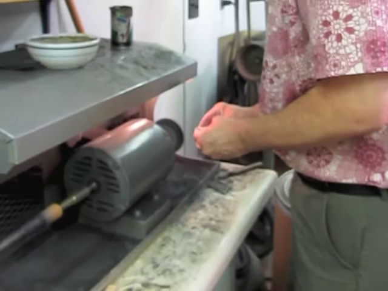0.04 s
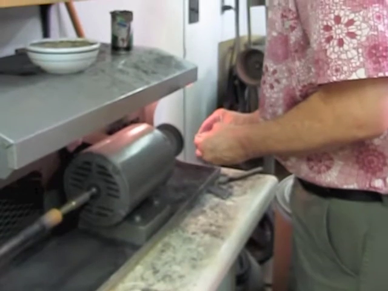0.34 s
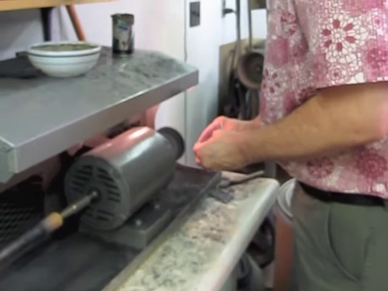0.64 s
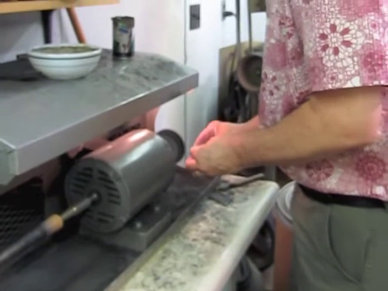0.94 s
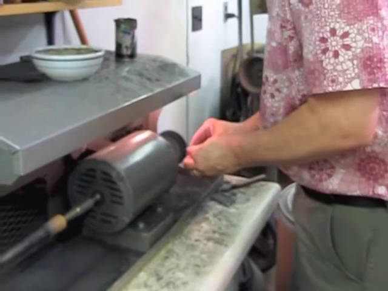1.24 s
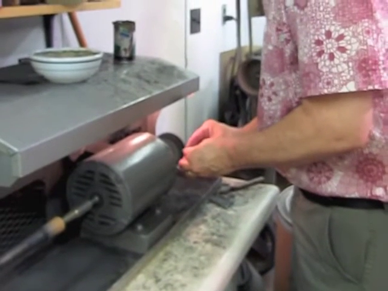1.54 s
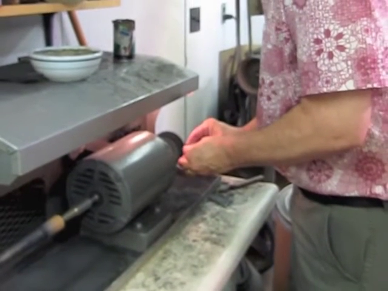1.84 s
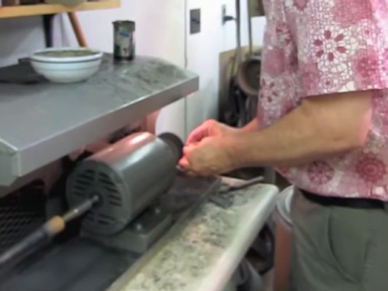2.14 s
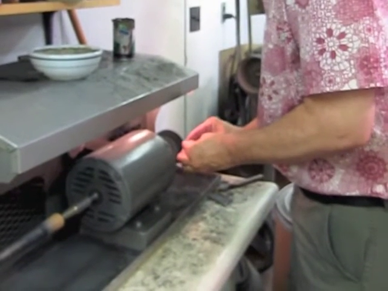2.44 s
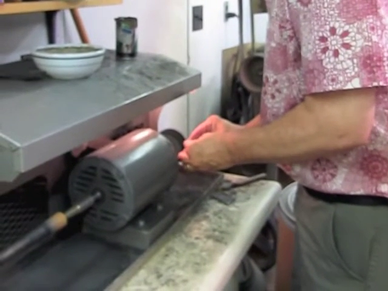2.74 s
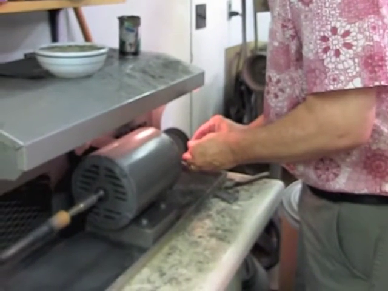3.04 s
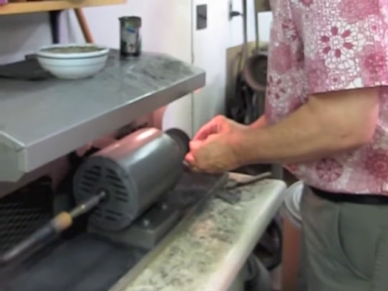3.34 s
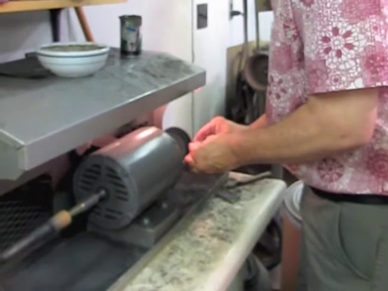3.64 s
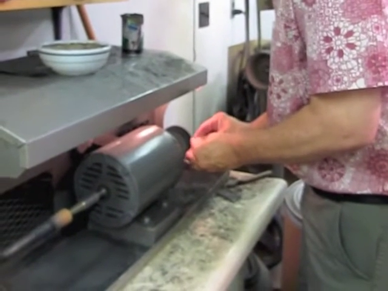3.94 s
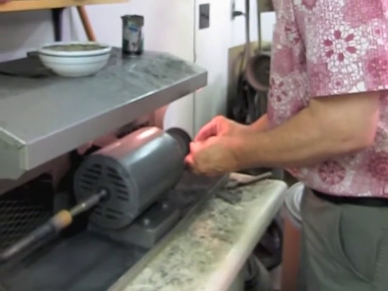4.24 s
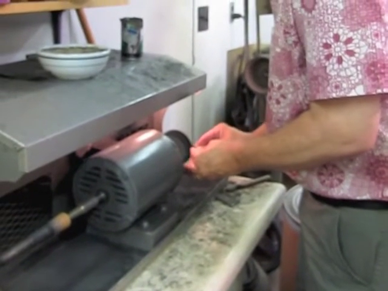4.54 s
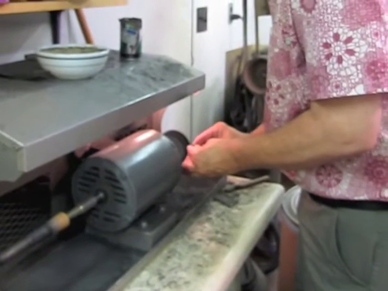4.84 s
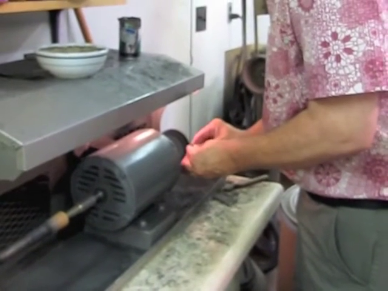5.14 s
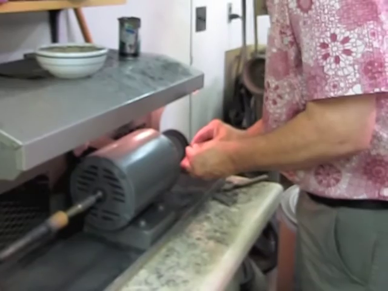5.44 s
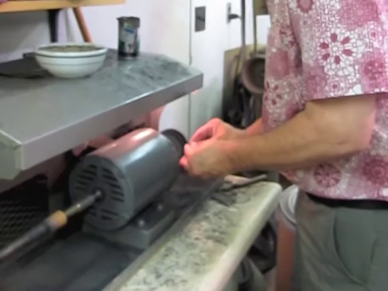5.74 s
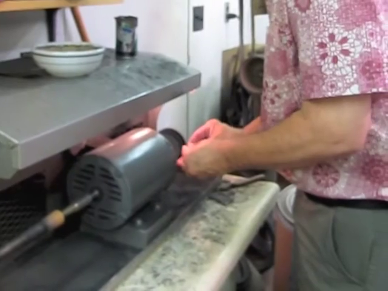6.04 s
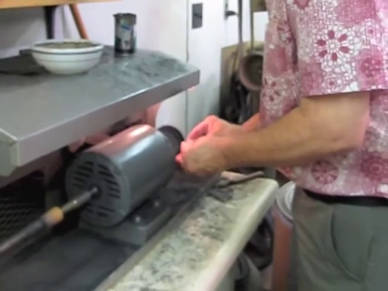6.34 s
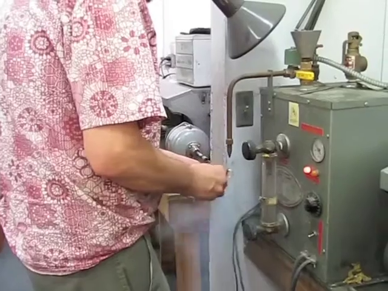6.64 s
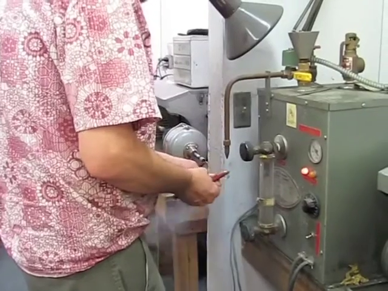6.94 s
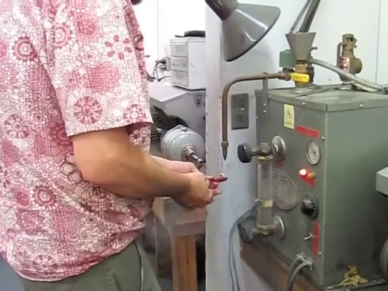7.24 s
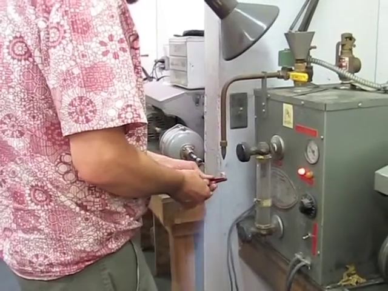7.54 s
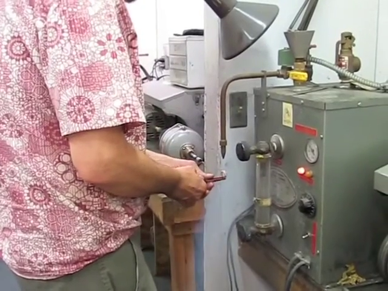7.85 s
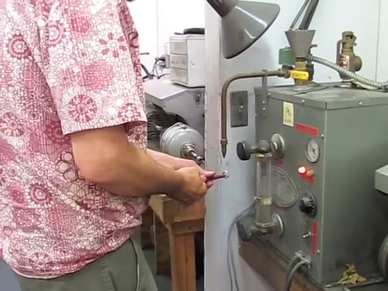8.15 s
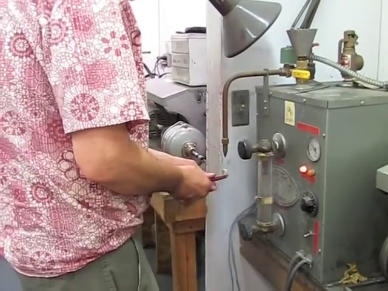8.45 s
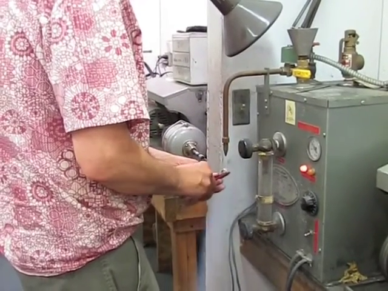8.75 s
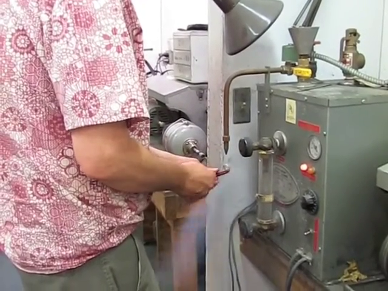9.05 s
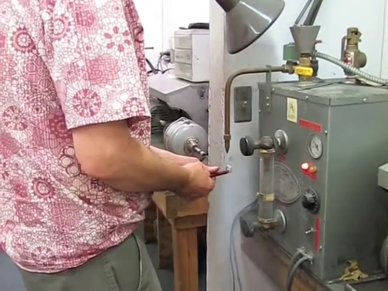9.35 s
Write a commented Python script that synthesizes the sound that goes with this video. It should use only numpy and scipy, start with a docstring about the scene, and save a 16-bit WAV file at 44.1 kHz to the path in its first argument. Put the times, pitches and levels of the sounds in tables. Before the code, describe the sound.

A workshop polishing wheel hums with a soft rubbing of cloth on metal, giving way to a loud hiss of steam.

```python
"""A polishing lathe in a jeweler's workshop, heard in stereo from the bench. It sings at ten times its
shaft rate over mains hum and a dust blower; a ring pressed on the buff slows the shaft a little and
makes the cloth hiss. At about 6.5 s the bench fades out and a steam cleaner fades in, loud at the
microphone: its jet hisses on the turning ring and phases with echoes off the moving hands."""
import sys
import numpy as np
from scipy import signal
from scipy.fft import rfft, irfft, next_fast_len
from scipy.io import wavfile
from scipy.ndimage import uniform_filter1d

SR = 44100
rng = np.random.default_rng(int(sys.argv[2]) if len(sys.argv) > 2 else 0)


def file_out(sig):
    """Save sig as 16-bit WAV at sys.argv[1]."""
    # one column per channel
    cols = np.atleast_2d(sig).T
    # limit, then scale
    lim = np.clip(cols, -1, 1)
    pcm = np.round(lim * 32767).astype(np.int16)
    wavfile.write(sys.argv[1], SR, pcm)


N = 419391

# Steady lines of mains and blower. Each row: pitch in Hz, level in dB, left minus right in dB.
HUM_LINES = [(25.8, -59, 9), (59.7, -42, 8), (119.6, -46.5, -4), (128.9, -37, 2.5), (179.6, -49.5, 0),
             (206.2, -43.5, 4)]
# Air from the blower and the idle wheel. Each row: frequency in Hz, relative density in dB.
AIR_COLOUR = [(15, -44), (35, -26), (80, -21), (125, -12), (170, -13), (230, -4.5), (300, -11), (400, -7),
              (480, -13), (750, -11.5), (1200, -19), (2500, -20), (3300, -28.5), (7000, -32.5),
              (11500, -39.5), (15000, -62)]
# Stereo width of the air and the cloth. Each row: frequency in Hz, side minus mid in dB.
BENCH_WIDTH = [(60, -2), (200, -14), (400, -10), (700, -6.5), (1300, -3.5), (4400, -5), (8000, -3.5),
               (14000, 6.5)]
# Where the air sits at the microphone. Each row: frequency in Hz, left minus right in dB.
AIR_BALANCE = [(60, 7), (300, 0.5), (1000, -2), (2400, -2.5), (5000, -1)]
# Resonances and notches of the dust hood. Each row: centre in Hz, width in Hz, gain in dB.
HOOD_MODES = [(206, 8.1, 7), (244, 16.7, 9.5), (279, 13, 9), (298, 13, -3), (325, 29, 7.5), (389, 22, 2.5),
              (409, 24, 6.5), (438, 12, 1.5), (712, 22, 0), (845, 43, 2), (1527, 98, 5), (5040, 300, 6),
              (7360, 400, 2.5)]

# The steam jet's hiss. Each row: frequency in Hz, relative density in dB.
STEAM_COLOUR = [(30, -27), (100, -19), (250, -15.5), (1100, -16), (2000, -13), (3000, -9.5), (4200, -6.5),
                (5800, -4), (7000, 1.5), (9000, -1), (10500, 0.5), (12800, -1), (14200, 1), (15700, -4)]
# Stereo width of the hiss; the overloaded microphone adds a low rush, opposite in left and right.
# Each row: frequency in Hz, side minus mid in dB.
HISS_WIDTH = [(60, 10), (300, 8.5), (700, 8), (1300, 2.5), (2400, -1), (3600, -3.5), (6500, -4), (9000, -1),
              (13000, 0), (15000, -12)]
# Resonances and notches of nozzle and ring. Each row: centre in Hz, width in Hz, gain in dB.
NOZZLE_MODES = [(2070, 220, 1.8), (4100, 260, 1.5), (5070, 200, 1.7), (6800, 240, 0.3), (7100, 160, -0.5),
                (8240, 250, 2.5), (9750, 180, -0.5), (10200, 270, 2.2), (12720, 350, -1)]
# The ring slips out of the jet's core. Each row: start and end in seconds, dip in dB shared out below.
RING_SLIPS = [(6.5, 6.66, 2), (6.76, 7.0, 2), (7.26, 7.38, 1.5), (7.49, 7.6, 1.5), (7.9, 8.08, 3.2),
              (8.49, 8.62, 2), (8.86, 9.06, 1), (9.39, 9.6, 1)]
# The ring sits squarely in the jet. Each row: start and end in seconds, rise in dB shared out below.
SPLASH_SURGES = [(7.66, 7.89, 1.9), (8.07, 8.44, 1.5), (9.18, 9.44, 1.6)]
# The ring's edge cuts into the jet and sharpens the hiss.
# Each row: middle and length in seconds, rise in dB shared out below, whistle pitch in Hz.
EDGE_CUTS = [(7.18, 0.21, 1.3, 7300), (7.41, .08, 1.5, 7200), (7.84, 0.1, 0.8, 7000),
             (8.91, 0.16, 2.5, 8200), (9.13, 0.18, 2, 7600)]
# The jet strikes more or less of the hands. Each row: start and end in seconds, low rush change in dB.
HAND_BUFFETS = [(6.5, 6.82, -1), (7.17, 7.27, 1.2), (7.6, 7.894, 1.1), (7.98, 8.08, -2), (8.56, 8.8, 0.5),
                (8.893, 9.18, 2.5), (9.36, 9.6, -2)]
# The steam's bands. Each gives: resting gain in dB, share of a slip, of a surge, of a cut.
RUSH, SPLASH = (-0.5, 0.33, 0.1, 0.1), (0.3, 0.62, 0.73, 0.089)
EDGE, FREE_JET = (-0.25, 0.32, 0.3, 0.69), (0, 0.03, 0.1, 0.25)

# Cloth on metal. Each row: frequency in Hz, relative density in dB.
CLOTH_COLOUR = [(300, -1.5), (900, -4), (1800, -1.5), (3500, -4.5), (6000, -5), (9000, -11.5),
                (12000, -18.5), (15500, -33)]
# The ring is pressed on the buff. Each row: start and end in seconds, force 0-1, attack in seconds.
RING_PRESSES = [(1.24, 2.62, 0.56, 0.46), (2.549, 3.6, .92, .12), (3.34, 4.66, 1, .4),
                (4.879, 5.998, .76, 0.402), (5.68, 6.8, 1, .36)]
# The ring catches and shakes the wheel. Each row: start and end in seconds, added shake in dB.
RING_CATCHES = [(1.42, 1.6, -4), (1.8, 2.24, 1), (2.15, 2.49, 3), (2.94, 3.49, -3.5), (3.72, 3.92, -5),
                (4.82, 4.99, -2), (5.78, 6.02, -2)]
# The ring grazes the wheel and the fifth overtone rings. Each row: start and end in seconds, level in dB.
RING_GRAZES = [(.9, 2.88, -54), (4.38, 5.4, -55)]
# Tones of the shaking wheel. Each row: multiple of the shaft rate, level in dB at a shake of 0 dB.
SHAFT_ORDERS = [(8, -49), (9, -40), (12, -54), (16, -57), (26, -53), (31, -58)]
# Bearing whine, beating against the overtones.
# Each row: multiple of the lathe's tone, level in dB running free, left minus right in dB.
BEARING_WHINE = [(4.0395, -46, -5), (7.77, -64, 0), (8.079, -57, 0), (8.415, -55, 0), (11.195, -63, 0),
                 (11.49, -65.5, 0), (12.118, -59, 0)]
# The lathe's overtones. Each row: multiple of the tone, relative level in dB, left minus right in dB.
LATHE_OVERTONES = [(2, -28, -12), (3, -30.5, 2), (4, -19.5, -17.5), (8, -28, -4), (9, -30.5, -4),
                   (10, -38, -5), (11, -32.5, -6), (12, -30, -7), (14, -34, 16), (15, -38, 4), (16, -40, 7)]

IDLE_HZ, SAG_HZ = 597.5, 2.05  # the lathe's tone running free, and its drop under full force
FADE_OUT_S, CHANGE_S, FADE_IN_S = 6.445, 6.54, 6.645


def undb(db):
    """Decibels to gain."""
    return 10 ** (np.asarray(db) / 20)


def along(points, hz):
    """Read (Hz, value) points on a log-frequency axis."""
    f, value = np.transpose(points)
    return np.interp(np.log(hz + 1), np.log(f), value)


def walk(rate):
    """Smooth chance with a spread near 1, changing about rate times a second."""
    k = max(int(SR / rate), 1)
    steps = np.repeat(rng.standard_normal(N // k + 1), k)
    return 1.3 * uniform_filter1d(uniform_filter1d(steps, k), k)[:N]


def hold(start, end, attack_s, release_s):
    """An envelope that rises from start, holds at 1 and has fallen by end."""
    t = np.arange(N) / SR
    return np.clip(np.minimum((t - start) / attack_s, (end - t) / release_s), 0, 1)


def swell(middle, length):
    """A bell-shaped swell of height 1, with its length taken at half height."""
    t = np.arange(N) / SR
    return 0.5 ** ((2 * (t - middle) / length) ** 2)


def pan(db):
    """Left and right gains for a level difference."""
    return undb(np.array([[1], [-1]]) * db / 2)


def turbulence(colour, width, db, modes=(), balance=((100, 0), (1000, 0))):
    """Stereo flow noise with a colour and resonances; db is its mid level before the balance."""
    size = next_fast_len(N, real=True)
    hz = np.fft.rfftfreq(size, 1 / SR)
    modes_db = sum(lift / (1 + (2 * (hz - f) / width_hz) ** 2) for f, width_hz, lift in modes)
    gain = undb(along(colour, hz) + modes_db)
    mid, side = rfft(rng.standard_normal((2, size))) * gain / np.sqrt(np.mean(gain ** 2))
    channels = mid + np.array([[1], [-1]]) * side * undb(along(width, hz))
    return undb(db) * irfft(channels * pan(along(balance, hz)), size)[:, :N]


def partial(cycles, db, pan_db, flutter, skew_rad=0):
    """A stereo sine; moving air and changing reflections make it flutter at the microphone."""
    phase = 2 * np.pi * (cycles + rng.random())
    direct = np.array([np.sin(phase), np.sin(phase + skew_rad)])
    scattered = np.array([walk(9) * np.cos(phase), walk(9) * np.sin(phase)])
    return undb(db) * pan(pan_db) * (direct + flutter * scattered)


def resonance(x, hz, width_hz):
    """A band-pass with gain 1 at a centre that may move."""
    carrier = np.exp(2j * np.pi * np.cumsum(hz) / SR)
    pole = np.exp(-np.pi * width_hz / SR)
    return 2 * np.real(signal.lfilter([1 - pole], [1, -pole], x / carrier) * carrier)


def reflections(x, share, drift_ms, delays_ms=(1.5, 16), count=10):
    """Small surfaces close by comb the treble, differently left and right; echoes shift as things move."""
    n = np.arange(N)
    treble = signal.sosfilt(signal.butter(2, 800, "high", fs=SR, output="sos"), x)
    out = x.copy()
    for channel in range(2):
        for delay_ms in rng.uniform(*delays_ms, count):
            place = n - (delay_ms + drift_ms * walk(1.55)) * SR / 1000
            echo = np.interp(place, n, treble[channel])
            out[channel] += share / np.sqrt(count) * rng.choice([-1, 1]) * echo
    return out / np.sqrt(1 + share ** 2)


def blower():
    """The bed behind the bench: mains hum, the blower's blade tone, and air drawn through the dust hood."""
    t = np.arange(N) / SR
    hum = sum(partial(hz * t, db, pan_db, flutter=0.1, skew_rad=0.43) for hz, db, pan_db in HUM_LINES)
    air = turbulence(AIR_COLOUR, BENCH_WIDTH, -31.5, HOOD_MODES, AIR_BALANCE) * undb(0.27 * walk(12))
    return hum + reflections(air, share=0.31, drift_ms=0.0054)


def nozzle(hiss, cuts):
    """The nozzle's resonances slide together and waver as the ring turns; each cut adds an airy whistle."""
    tuning = 1 + 0.008 * walk(5)
    modes = sum((undb(db + 1.1 * walk(7)) - 1) * resonance(hiss, hz * tuning, width_hz)
                for hz, width_hz, db in NOZZLE_MODES)
    whistles = sum((undb(1.5 * db) - 1) * resonance(hiss, hz * tuning, width_hz=450) for db, hz in cuts)
    return hiss + modes + whistles


def steam():
    """The jet sputters; the turning ring shifts it between low rush, splash, edge hiss and free jet."""
    slip_db, surge_db, buffet_db = (sum(db * hold(start, end, 0.04, 0.04) for start, end, db in table)
                                    for table in (RING_SLIPS, SPLASH_SURGES, HAND_BUFFETS))
    cuts = [(db * swell(middle, length), hz) for middle, length, db, hz in EDGE_CUTS]
    cut_db = sum(db for db, hz in cuts)
    rush_db, splash_db, edge_db, jet_db = (db - slip * slip_db + surge * surge_db + cut * cut_db
                                           for db, slip, surge, cut in (RUSH, SPLASH, EDGE, FREE_JET))
    hiss = nozzle(turbulence(STEAM_COLOUR, HISS_WIDTH, -16), cuts)
    lowpasses = (signal.butter(4, hz, fs=SR, output="sos") for hz in (1800, 6400, 10500))
    low, below_edge, below_jet = (signal.sosfiltfilt(sos, hiss) for sos in lowpasses)
    rush = low * undb(rush_db + buffet_db + 0.31 * walk(12))
    splash = (below_edge - low) * undb(splash_db + 0.5 * walk(40))
    edge = (below_jet - below_edge) * undb(edge_db + 0.5 * walk(40))
    jet = (hiss - below_jet) * undb(jet_db + 0.4 * walk(25))
    sputter = undb(0.35 * walk(200))
    return (rush + splash + edge + jet) * sputter


def steam_cleaner():
    """The jet at the microphone: phased by the moving hands and body, then echoed from farther off."""
    phased = reflections(steam(), share=0.37, drift_ms=0.17, delays_ms=(1.1, 3.8), count=4)
    return reflections(phased, share=0.36, drift_ms=0.015, delays_ms=(5, 16), count=7)


def buff(cycles, force):
    """Cloth rubs the ring with a power that follows the force, pulsing with the shaft and the tone."""
    idle_db, pressed_db = -10, 1.66
    rub = np.sqrt(undb(idle_db) ** 2 + undb(pressed_db) ** 2 * force)
    pulsing = 1 + 0.054 * np.sin(2 * np.pi * cycles / 10) + 0.09 * np.sin(2 * np.pi * cycles)
    cloth = turbulence(CLOTH_COLOUR, BENCH_WIDTH, -42.5) * rub * undb(0.77 * walk(20.95)) * pulsing
    return reflections(cloth, share=0.65, drift_ms=0.009)


def lathe(cycles, force):
    """The ten-per-turn tone with its overtones, bearing whine, and shaft orders from the shaking wheel."""
    shaft_turns = cycles / 10
    tone_db = -23 - 0.7 * force + 0.5 * walk(14)
    tone = partial(cycles, tone_db, -0.9, flutter=0.05, skew_rad=0.57)
    overtones = sum(partial(k * cycles, db - 25 - force, pan_db, flutter=0.072, skew_rad=0.99)
                    for k, db, pan_db in LATHE_OVERTONES)
    grazes = sum(undb(db) * hold(start, end, 0.36, 0.36) for start, end, db in RING_GRAZES)
    fifth = (undb(-51) + grazes) * partial(5 * cycles, 0, -6.5, flutter=0.21)
    sixth = partial(6 * cycles, -56 + 6.5 * force, 0, flutter=0.13, skew_rad=0.9)
    whine = sum(partial(k * cycles, db - 2.7 * force, pan_db, flutter=0.074, skew_rad=0.68)
                for k, db, pan_db in BEARING_WHINE)
    catches = sum(undb(db) * hold(start, end, 0.075, 0.075) for start, end, db in RING_CATCHES)
    shake = undb(-14) + undb(-11.5) * force + catches
    wobble = shake * sum(partial(k * shaft_turns, db, 0, flutter=0.4) for k, db in SHAFT_ORDERS)
    eleventh_order = force * partial(11 * shaft_turns, -48.5, 0, flutter=0.26)
    return tone + overtones + fifth + sixth + whine + wobble + eleventh_order


def scene():
    """Two positions: first at the bench, where the ring loads the lathe, then at the steam cleaner."""
    t = np.arange(N) / SR
    force = sum(strength * hold(start, end, attack_s, release_s=0.2993)
                for start, end, strength, attack_s in RING_PRESSES)
    cycles = np.cumsum(IDLE_HZ - SAG_HZ * force) / SR
    at_bench = np.interp(t, (FADE_OUT_S, CHANGE_S), (1, 0))
    at_steamer = np.interp(t, (CHANGE_S, FADE_IN_S), (0, 1))
    jet = steam_cleaner()
    bench = lathe(cycles, force) + blower() + buff(cycles, force)
    return at_bench * bench + at_steamer * jet


def record(dry):
    """The camera cuts the microphone's top end steeply above 15750 Hz."""
    return signal.sosfilt(signal.ellip(12, 0.1, 80, 15750, fs=SR, output="sos"), dry)


dry = scene()
out = record(dry)
file_out(out)
```